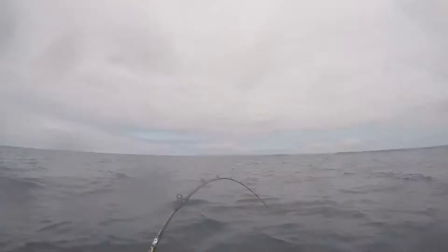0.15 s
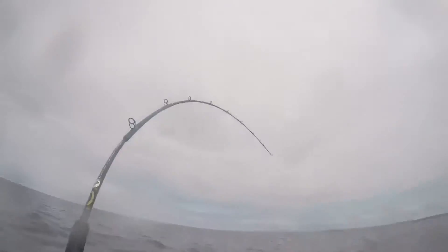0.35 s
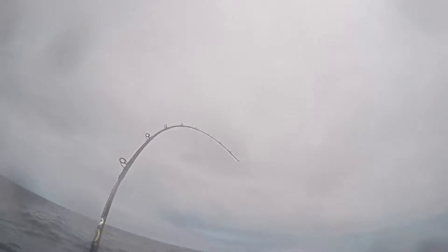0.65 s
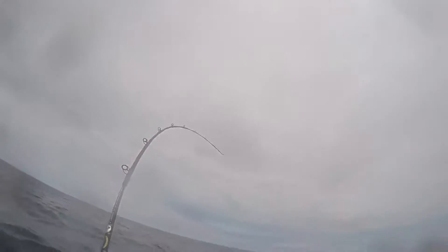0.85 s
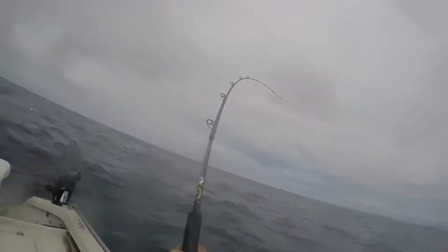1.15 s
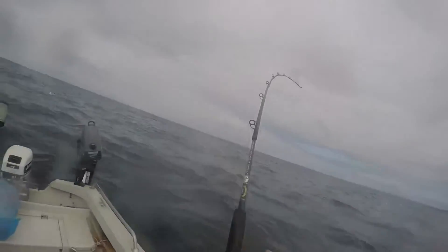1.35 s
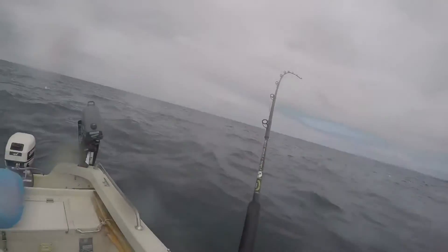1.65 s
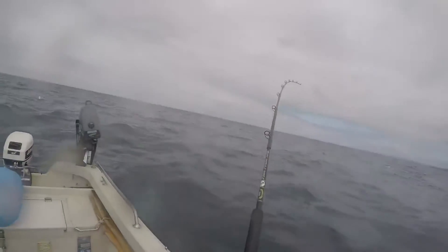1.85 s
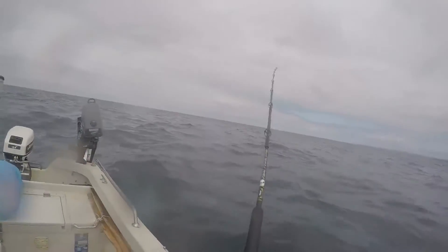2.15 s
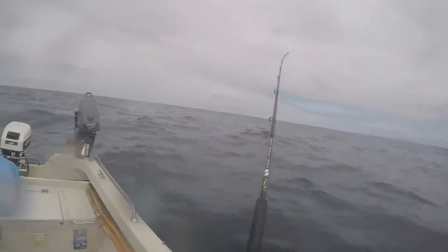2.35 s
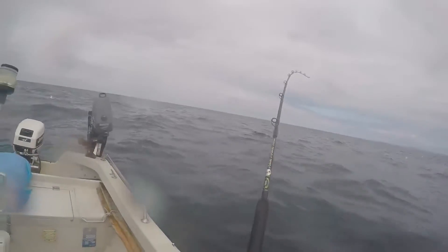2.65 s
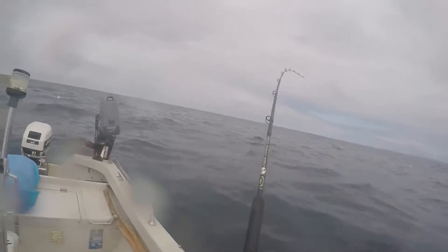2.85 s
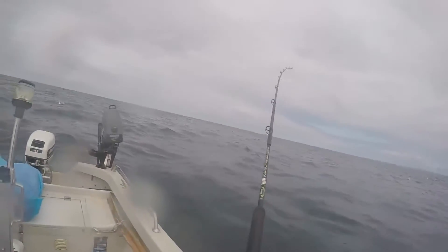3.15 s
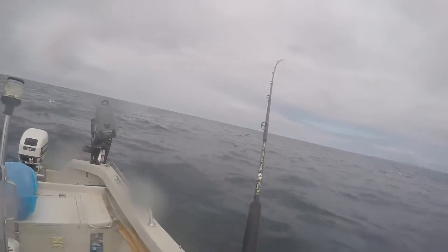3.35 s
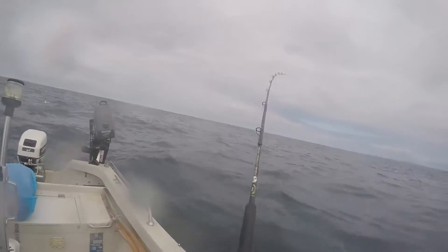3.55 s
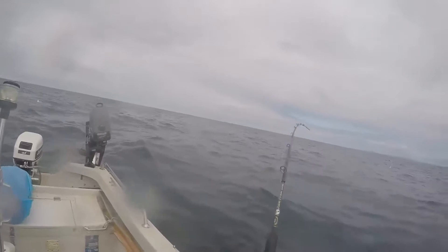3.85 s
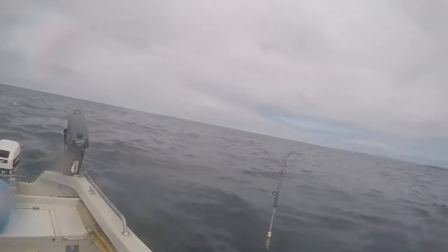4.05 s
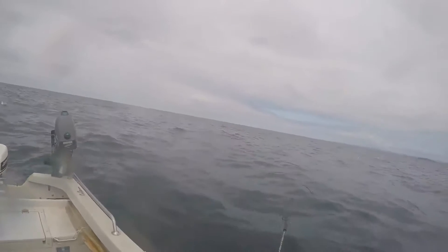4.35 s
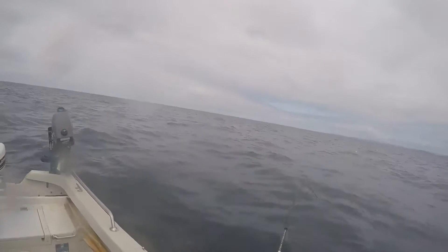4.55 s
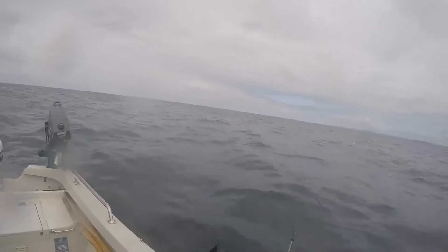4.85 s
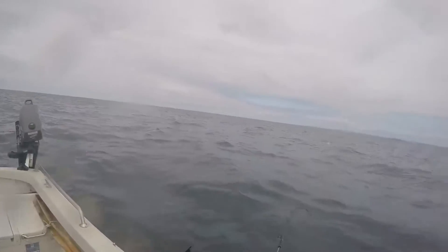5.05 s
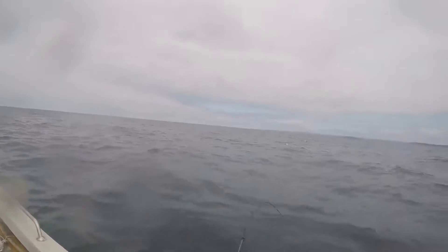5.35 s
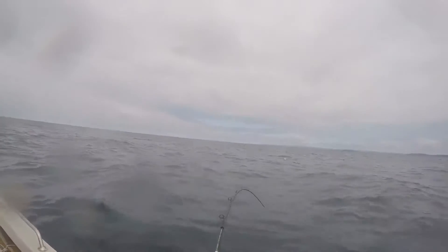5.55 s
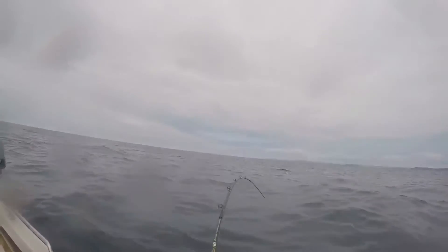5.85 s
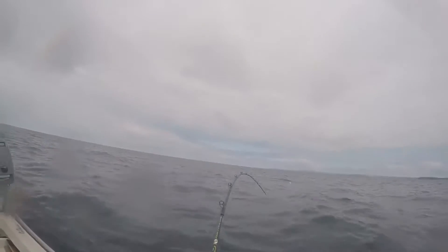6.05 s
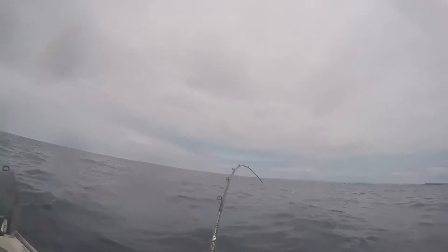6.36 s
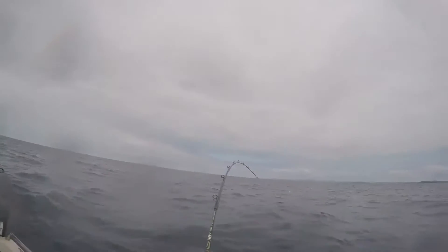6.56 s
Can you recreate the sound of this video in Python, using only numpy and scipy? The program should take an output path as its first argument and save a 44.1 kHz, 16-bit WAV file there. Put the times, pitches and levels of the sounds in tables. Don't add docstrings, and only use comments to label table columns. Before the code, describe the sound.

Faint calm air cuts to a split-second silence, then heavy wind swells and rumbles on the microphone aboard a small open boat. Soft crank ticks come first, then a short fast reel buzz around two seconds, a hard lever clack near three, and a long pulsing ratchet rattle that slows to separate clicks. Close, mono, rough and dull on top.

```python
import sys
import numpy as np
from scipy import signal
from scipy.fft import rfft, irfft, next_fast_len
from scipy.io import wavfile
from scipy.ndimage import uniform_filter1d, map_coordinates

SR = 44100
rng = np.random.default_rng(int(sys.argv[2]) if len(sys.argv) > 2 else 0)


def dump(signal):
    limited = np.clip(np.atleast_2d(signal).T, -1, 1)
    pcm = np.round(limited * 32767).astype(np.int16)
    wavfile.write(sys.argv[1], SR, pcm)


def natural_amplitude(level_db):
    exponent = np.asarray(level_db, float) / 20
    return 10 ** exponent


N = 295600

# [t/s, rate/teeth per s, level/dB]
FIRST_RUN = [
    (2.0637, 84.6, -17.3),
    (2.0929, 120.7, -18.3),
    (2.1756, 168.3, -16.8),
    (2.229, 205.2, -18.1),
    (2.2637, 203.2, -19.4),
    (2.2893, 190.6, -19.0),
    (2.335, 135, -18.8),
    (2.3537, 33.8, -25),
]
# [first tooth t/s, next tug or
# halt t/s, count/teeth, mid-tug swell/share of speed, speed-up/share of speed]
TUGS = [(3.5749, 3.6905, 12, -0.1, 0.38), (3.6905, 3.8131, 19, 0.2, -0.14), (3.8131, 3.9548, 22, 0.3, 0.14),
        (3.9548, 4.0939, 25, 0.6, -0.04), (4.0939, 4.2625, 26, 0.1, 0.26), (4.2625, 4.3543, 12, 0.2, -0.42),
        (4.3543, 4.4394, 8, -0.2, 0.5), (4.4394, 4.4859, 5, -0.0, -0.5), (4.4859, 4.6303, 13, 0.7, -0.2),
        (4.6303, 4.7673, 9, 0.65, 0.16), (4.7673, 4.9329, 10, 0.6, -0.36), (4.9329, 5.1402, 16, 1.0, 0.22),
        (5.1402, 5.2185, 4, -0.2, -0.52), (5.4835, 5.6498, 9, 0.5, -0.3), (5.6498, 5.8589, 7, -0.0, 0.0),
        (5.8589, 6.0632, 6, 0.05, -0.08), (6.0632, 6.2988, 5, -0.0, -0.14)]
# [t/s, level/dB]
SNAP_LOAD = [
    (3.57, -15),
    (3.85, -17),
    (4.05, -17),
    (4.25, -18),
    (4.42, -20),
    (4.6, -18),
    (4.64, -17),
    (5.3, -17.5),
    (6.3, -16.5),
]
# [t/s, peak level/dB]
EARLY_SNAPS = [(0.6388, -22.5), (2.0156, -22.5), (2.0478, -17.5), (2.3945, -19), (2.4367, -21),
               (2.4804, -20), (2.504, -20.5), (2.5282, -20.5), (2.5714, -19.5), (2.6916, -21),
               (2.727, -14.5)]
# [t/s, peak level/dB]
LATE_SNAPS = [
    (5.2794, -26),
    (5.317, -17.5),
    (5.346, -16),
    (5.3564, -24),
    (5.3716, -17.5),
    (5.399, -28),
    (6.3769, -15.5),
]
# [t/s, peak level/dB]
PAWL_TICKS = [(0.34, -42), (0.4277, -44), (0.4902, -41.5), (0.6258, -29.5), (0.7906, -33), (0.8188, -32.5),
              (0.861, -27), (1.0285, -29.5), (1.0458, -26.5), (1.07, -23.5), (1.1457, -32.5),
              (1.2155, -28.5), (1.296, -30), (1.3603, -22), (1.5085, -26.5), (1.6425, -28.5), (1.7297, -27),
              (1.7893, -24), (1.876, -32), (1.9168, -26), (2.0034, -25.5), (2.4768, -26), (2.614, -21.5),
              (2.7276, -25), (2.9123, -30), (3.053, -26), (3.1263, -34.5), (3.1846, -23), (0.5717, -42),
              (2.7747, -35.5),
              (6.426, -32),
    (6.485, -38),
    (6.5848, -36),
]
# [t/s, peak level/dB]
PINGS = [(0.3696, -49), (0.4823, -42), (0.6878, -45), (0.8917, -42), (1.0131, -44), (1.042, -30),
         (1.4205, -35), (1.4391, -41), (1.0774, -43), (1.1367, -46.5), (1.5768, -50), (1.6703, -41),
         (1.696, -38), (1.713, -38), (1.8317, -38), (1.8487, -35), (1.9744, -40), (1.9824, -35),
         (2.5413, -44), (2.682, -36)]
# [t/s, peak level/dB]
CLACKS = [
    (2.9645, -31),
    (2.9717, -30),
    (2.9786, -19),
    (2.9844, -9.5),
    (2.9916, -21),
    (3.041, -15.5),
]
# [from t/s, to t/s, level/dB, sag/dB per s]
WHIR = [
    (3.259, 3.6, -37, 27),
    (3.714, 4.25, -37, 3),
    (4.257, 4.65, -41, 13),
    (4.656, 5.0, -52, 18),
    (5.05, 5.22, -45.5, -20),
    (5.236, 5.44, -35.5, 23),
    (5.478, 5.59, -42.5, -32),
]
# [t/s, level/dB]
WIND = [(.22, -53), (.3, -36.5), (.47, -32.5), (.62, -26.5), (.9, -22), (1.2, -19), (1.45, -13),
        (1.85, -18), (2.3, -21), (2.8, -19), (3.5, -17), (3.85, -20), (4.9, -19.5), (5.3, -15.5),
        (5.8, -21), (6.2, -16), (6.7, -20)]
# [t/s, roar level/dB]
CALM = [
    (0.0, -37),
    (0.125, -39),
]
# [t/s, buffet level/dB, roar level/dB, extra flutter level/dB]
EDDIES = [(.74, 2.5, -14.5, 1), (.8, 7, 6, -4), (.94, 11, 3, 1.5), (1.08, -1.5, 1, -10), (1.36, 3, 2, -2),
          (1.65, 0, 2, 3), (1.93, -4.5, -6, 1), (1.97, 1.5, 4, -1), (2.22, 4, -4, 5), (2.46, 0.5, -5, -5),
          (2.58, 8, 4.5, 5), (2.87, 7, 1.5, -9), (2.92, 2.5, -14, -2), (3.02, 4.5, 3.5, -7),
          (3.25, 1, 1.5, 3), (3.38, 6.5, 0, 1.5), (3.52, 0, 7, -5), (3.74, 4, -1.5, 2), (3.94, 10.5, 5, 2),
          (4.24, 4, 4.5, 5), (4.32, 0.5, 2.5, 4.5), (4.59, 10, 6.5, 2.5), (4.78, 7.5, 1, 2),
          (5.11, 2.5, 4.5, 4), (5.44, 0, 2.5, 5), (5.6, -1, 2, 2), (5.83, 4.5, -4, 6), (5.97, 0.5, 6, -0.5),
          (6.43, 9, 10, -1), (6.62, 6.5, 9.5, -2)]

# [f/Hz, width/Hz, level/dB]
LOADED_PLATE = [(1194, 230, -9), (1870, 120, -6.5), (2900, 2800, -12.5), (4220, 760, -3), (5470, 760, 1),
                (7270, 1060, -3), (9530, 780, -6.5), (14100, 1400, -17)]
GRIPPED_PLATE = [(1200, 130, -0.5), (2200, 560, -8), (3090, 280, -1.5), (3750, 440, -2), (4900, 890, 0),
                 (6040, 470, 0.5), (7100, 1400, -4.5), (10100, 1300, -11.5), (13600, 1700, -8)]
LOOSE_PLATE = [(2670, 920, -10), (4850, 610, -0.5), (5800, 640, -0.5), (7170, 1140, -5.5), (9870, 520, -8),
               (14000, 1900, -7.5)]
SLOW_PLATE = [(2100, 960, -8.5), (3090, 420, -5), (4100, 890, -2), (5280, 730, 2), (6980, 1640, -3),
              (9910, 850, -5.5), (14700, 4600, -12)]
# [f/Hz, width/Hz, level/dB]
PAWL_MODES = [(2730, 270, -3.5), (3890, 115, -6), (4940, 360, -4), (6140, 140, -17.5)]
RING_MODES = [(4740, 1200, 4.5), (7500, 2500, 2.5)]
LEVER_MODES = [(1130, 93, 7), (1690, 260, -0.5), (2360, 600, 3.5), (4100, 3400, 0), (7100, 2200, 0),
               (10200, 1300, -8), (14000, 2500, -16)]

# [f/Hz, level/dB per Hz]
LINE_COLOUR = [(1200, -40), (2000, -14), (2900, -7), (3700, -11), (4500, -1), (5300, 0), (6200, -7),
               (7000, -15), (8700, -26), (10500, -19), (14500, -22), (15500, -30)]
WASH_COLOUR = [(1060, -25), (1800, -14.5), (2280, 2.5), (2840, 1), (3850, -6.5), (4180, -3.5), (5570, -8.5),
               (8000, -14.5), (10400, -55.5), (17600, -120)]
FIZZ_COLOUR = [(4000, -40), (7000, -4), (9500, 0), (12000, -4), (14500, -3), (15500, -12)]
BUFFET_COLOUR = [(8.8, -35.5), (15, -5.5), (43, 6), (65, 2), (113, -3.5), (200, -12.5), (260, -31),
                 (440, -120)]
ROAR_COLOUR = [(53, -52), (90, -0.5), (113, -3.5), (231, -1.5), (334, -2), (408, -4), (441, -3.5),
               (572, -15.5), (900, -36.5), (1170, -35.5), (1980, -120)]
FLUTTER_COLOUR = [(350, -16), (600, -10), (1910, -31.5), (2070, -36), (2640, -34), (3500, -52),
                  (4550, -60.5), (7700, -120)]

TIME_S = np.arange(N) / SR
GAP_START_S, GAP_END_S = .127, .228
EASE_S, SLOW_S = 4.33, 4.62
STEADY_DB = -19.5


def unit(x):
    return x / np.sqrt(np.mean(x ** 2) + 1e-20)


def curves(rows):
    s, *columns = np.transpose(rows)
    return [np.interp(TIME_S, s, column) for column in columns]


def wobble(rate):
    knots = rng.standard_normal(int(N * rate / SR) + 4)
    return map_coordinates(knots, [np.arange(N) * rate / SR])


def filtered(x, response):
    m = next_fast_len(N + 8192)
    return irfft(rfft(x, m) * response(np.fft.rfftfreq(m, 1 / SR)), m)[..., :N]


def noise(colour):
    hz, db = np.transpose(colour)
    gain = lambda f: natural_amplitude(np.interp(np.log(f + 1), np.log(hz + 1), db))
    return unit(filtered(rng.standard_normal(N), gain))


def struck(events, modes, snap_s, rattle_s, rattle_db, gain_db, hard_hz, sizzle_db=-12):
    s, db = np.transpose(events)
    t = np.arange(int(.06 * SR)) / SR

    def body(f):
        return sum((-1) ** k * natural_amplitude(g) * 1j * f * w / (c * c - f * f + 1j * f * w)
                   for k, (c, w, g) in enumerate(modes))

    soft = lambda f: 1 / (1 + 1j * f / hard_hz) ** 2
    loose = lambda f: natural_amplitude(sizzle_db) * (1j * f / 11000) ** 2
    snap, rattle = rng.standard_normal((len(s), 2, len(t))).transpose(1, 0, 2)
    snap = snap * (1 - np.exp(-t / .0006)) ** 2 * natural_amplitude(-60 * t / snap_s)
    rattle = rattle * (1 - np.exp(-t / 0.0022)) * natural_amplitude(rattle_db - 60 * t / rattle_s)
    hz = np.fft.rfftfreq(len(t), 1 / SR)
    rung = np.linalg.norm(rfft(snap) * body(hz) * soft(hz), axis=1)
    size = natural_amplitude(db + gain_db) * np.sqrt(len(t)) / rung
    where = np.round(s * SR).astype(int)[:, None] + np.arange(len(t))

    def force(burst):
        return np.bincount(where.ravel(), (size[:, None] * burst).ravel(), N + len(t))[:N]

    ring = lambda f: np.array([body(f), body(f) + loose(f)]) * soft(f)
    return filtered(np.array([force(snap), force(rattle)]), ring).sum(axis=0)


def clicker():
    run = tugged_teeth()
    loaded, fast = run[:, 0] < EASE_S, run[:, 0] < SLOW_S
    slow_snaps = np.vstack([run[~fast], LATE_SNAPS])
    early = struck(EARLY_SNAPS, LOOSE_PLATE, 0.016, 0.098, -29.5, 9.7, hard_hz=30000)
    first = struck(running_teeth(FIRST_RUN), GRIPPED_PLATE, .0048, .03, -16.5, 12.6, hard_hz=20000)
    second = struck(run[loaded], LOADED_PLATE, .0048, .03, -20, 10.96, hard_hz=19800)
    easing = struck(run[fast & ~loaded], SLOW_PLATE, .0048, .03, -18, 10.6, hard_hz=21000)
    slow = struck(slow_snaps, SLOW_PLATE, 0.0088, 0.086, -23, 9.02, hard_hz=21700)
    near = early + first + second + easing + slow
    echo = lambda f: natural_amplitude(-13) * np.exp(-2j * np.pi * f * .008) / (1 + 1j * f / 6000)
    return near + filtered(near, echo)


def running_teeth(run):
    rate, db = curves(run)
    first, last = round(run[0][0] * SR), round((run[-1][0] + .003) * SR)
    passed = np.floor(np.cumsum(rate[first:last]) / SR)
    at = first + np.flatnonzero(np.diff(passed, prepend=-1))
    scatter_db = 1.8 * rng.standard_normal(len(at))
    return np.transpose([at / SR - .0009, db[at] + scatter_db])


def tugged_teeth():
    u = np.linspace(0, 1, 400)
    at = []
    for (first, last, count, swell, lean), after in zip(TUGS, [*TUGS[1:], (0,)]):
        speed = 1 + swell * np.sin(np.pi * u) ** 2 + lean * (2 * u - 1)
        turned = np.cumsum(speed)
        turned = count * (turned - turned[0]) / (turned[-1] - turned[0])
        halts = after[0] != last
        at += list(first + (last - first) * np.interp(np.arange(count + halts), turned, u))
    at = np.array(at)
    scatter_db = 1.8 * rng.standard_normal(len(at))
    worn_db = 0.05 * (-1) ** np.arange(len(at)) * (at > SLOW_S)
    load_db = np.interp(at, *np.transpose(SNAP_LOAD))
    return np.transpose([at - .0011, load_db + scatter_db + worn_db])


def lever():
    return struck(CLACKS, LEVER_MODES, 0.0058, 0.048, -18.5, 10.8, hard_hz=20000)


def pawl():
    ticks = np.array(PAWL_TICKS)
    return struck(ticks, PAWL_MODES, 0.0086, 0.071, -21.5, 12.6, hard_hz=3000, sizzle_db=-41.5)


def guide_ring():
    return struck(PINGS, RING_MODES, 0.0057, .02, -35, 6.2, hard_hz=6000, sizzle_db=-40)


def line():
    rise_s, fall_s = 0.016, .03
    spells = 0
    for start, end, db, sag in WHIR:
        swell = np.exp(-np.maximum(start - TIME_S, 0) / rise_s)
        fade = np.exp(-np.maximum(TIME_S - end, 0) / fall_s)
        spells = spells + natural_amplitude(db - sag * np.clip(TIME_S - start, 0, end - start)) * swell * fade
    grain_db = 1.5 * wobble(40) + 1.5 * wobble(300)
    return spells * natural_amplitude(-0.1) * unit(natural_amplitude(grain_db) * noise(LINE_COLOUR))


def spray():
    surge_db = 1.5 * wobble(25)
    wash_db = -57 + 0.56 * strength() + surge_db
    fizz_db = -70.5 + 0.55 * strength() + 2.5 * wobble(6) + surge_db
    water = natural_amplitude(wash_db) * noise(WASH_COLOUR) + natural_amplitude(fizz_db) * noise(FIZZ_COLOUR)
    return water * (TIME_S > GAP_START_S)


def wind():
    thump_db, puff_db, flap_db = eddies()
    puffed_db = strength() + puff_db
    buffet_db = -19 + 0.85 * strength() + thump_db + 1.64 * wobble(12)
    roar_db = STEADY_DB + puffed_db + 1.18
    flutter_db = -38.5 + 1.1 * puffed_db + flap_db
    calm_db, = curves(CALM)
    lumps = wobble(18)
    buffet = unit(natural_amplitude(0.38 * wobble(4.88)) * noise(BUFFET_COLOUR))
    roar = unit(natural_amplitude(0.63 * lumps + 1.63 * wobble(50)) * noise(ROAR_COLOUR))
    flutter = unit(natural_amplitude(1.8 * lumps + 1.9 * wobble(90)) * noise(FLUTTER_COLOUR))
    gale = natural_amplitude(buffet_db) * buffet + natural_amplitude(roar_db) * roar + natural_amplitude(flutter_db) * flutter
    calm = natural_amplitude(calm_db - 9) * (buffet + roar) + natural_amplitude(calm_db - 27) * flutter
    return np.where(TIME_S < (GAP_START_S + GAP_END_S) / 2, calm, gale)


def strength():
    return curves(WIND)[0] - STEADY_DB


def eddies():
    rise_s, fall_s = 0.031, 0.047
    s, *layers_db = np.transpose(EDDIES)
    coarse_s = np.arange(0, N, 64) / SR
    t = coarse_s[:, None] - s
    shape = np.exp(-np.where(t < 0, (t / rise_s) ** 2, t / fall_s))
    return [np.interp(TIME_S, coarse_s, shape @ db) for db in layers_db]


def scene():
    reel = clicker() + lever() + pawl() + guide_ring()
    return (reel + line() + spray() + wind())[None]


def top_cut(x):
    return signal.sosfilt(signal.butter(12, 16490, fs=SR, output="sos"), x)


def record(dry):
    level = np.sqrt(np.abs(uniform_filter1d(dry ** 2, size=2200)))
    ridden = dry / (1 + (level / 0.3) ** 2) ** 0.36
    rounded = ridden / (1 + np.abs(ridden / .95) ** 6) ** (1 / 6)
    low_pass = signal.ellip(10, .3, 50, 15400, fs=SR, output="sos")
    dulled = signal.sosfilt(low_pass, rounded)
    outside_s = np.maximum(GAP_START_S - TIME_S, TIME_S - GAP_END_S)
    unmuted = np.clip(outside_s / 0.00066, 0, 1)
    return top_cut(dulled * unmuted)


dry = scene()
out = record(dry)
dump(out)
```